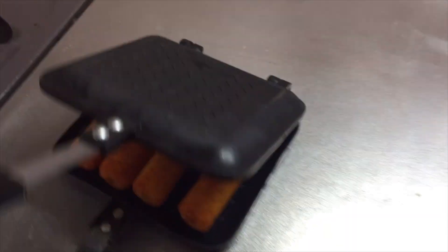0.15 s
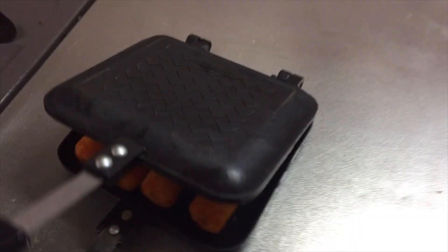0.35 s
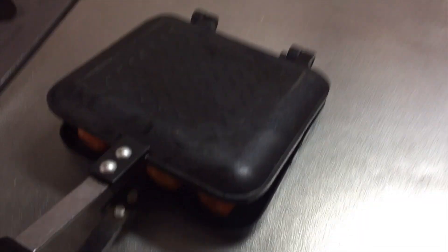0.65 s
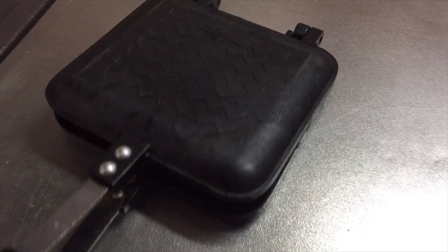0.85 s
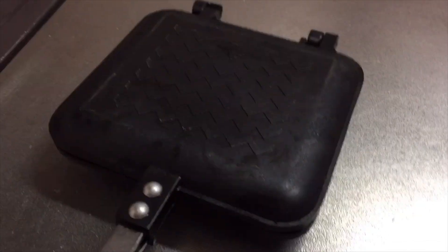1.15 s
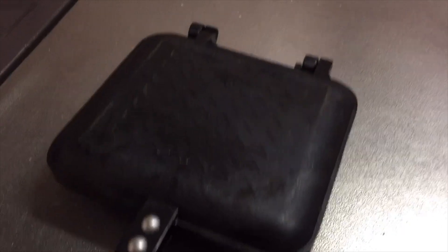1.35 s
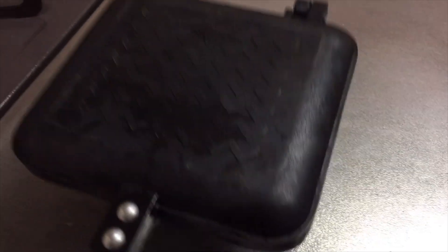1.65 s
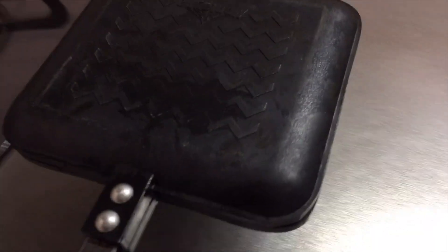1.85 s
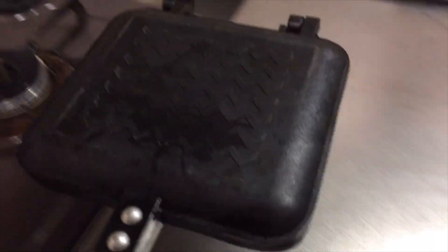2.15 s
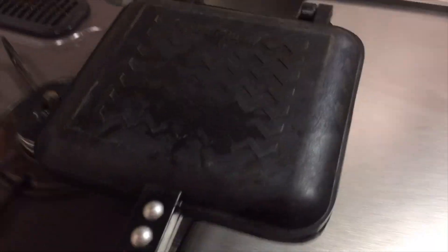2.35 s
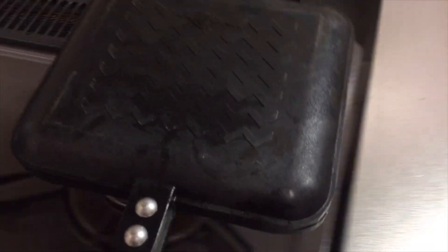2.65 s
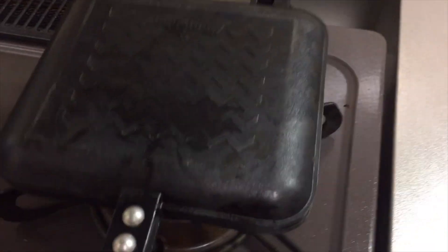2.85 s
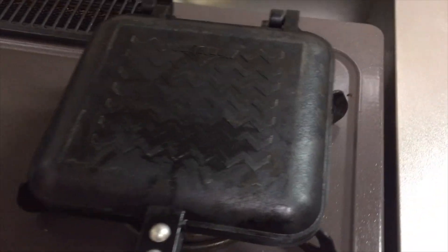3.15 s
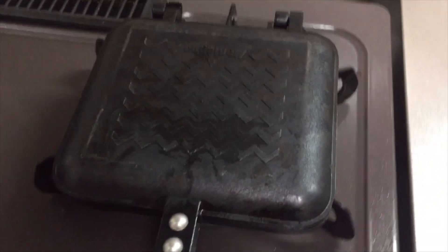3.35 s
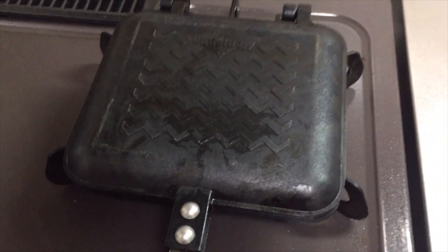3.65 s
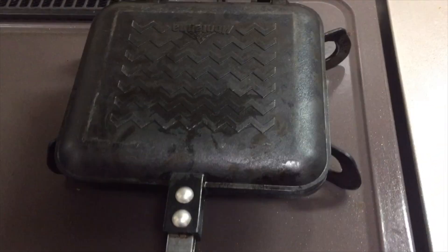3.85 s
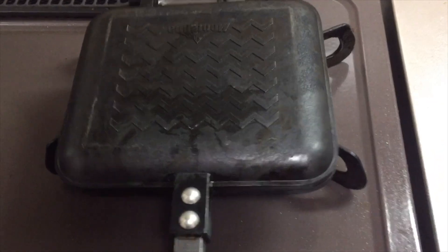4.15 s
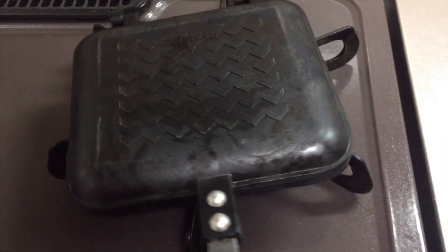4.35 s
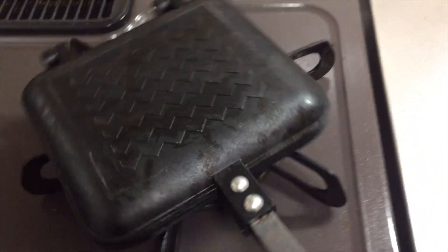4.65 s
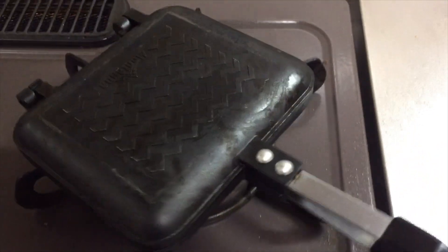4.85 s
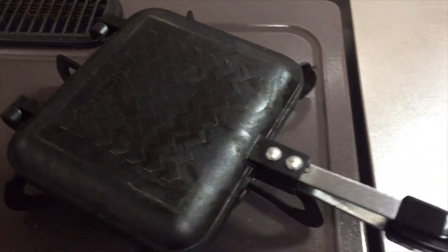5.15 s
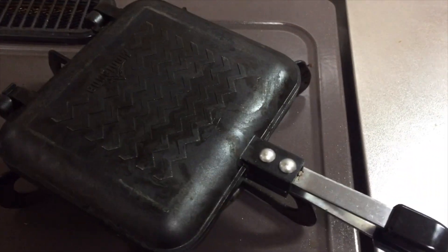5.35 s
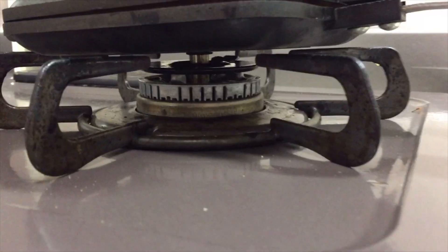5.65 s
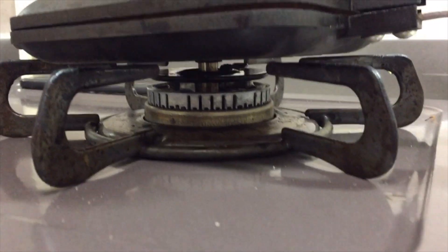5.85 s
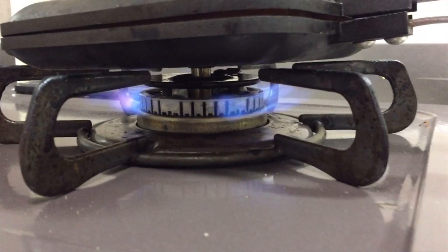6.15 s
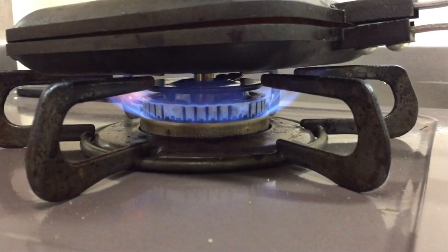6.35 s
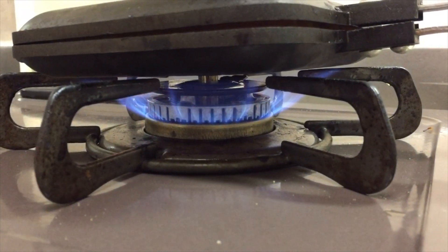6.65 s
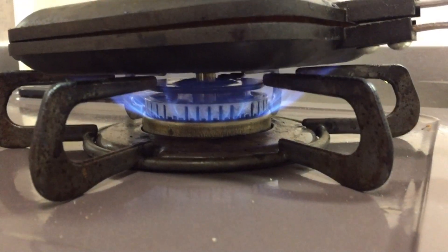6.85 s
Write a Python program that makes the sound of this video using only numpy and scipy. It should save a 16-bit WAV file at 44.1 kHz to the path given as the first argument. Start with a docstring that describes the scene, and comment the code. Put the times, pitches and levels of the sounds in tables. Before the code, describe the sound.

A small, quiet kitchen heard close up, with faint hush and a short diffuse echo. The first second is almost silent. Around 1.0 s a hinge squeaks faintly, then from 1.15 to 1.4 s the cast-metal press claps shut in a quick clatter, its hardest, dry ringing clack near 1.28 s. Small ticks and light scrapes follow until 2.8 s, clearest around 2.6 s. At 3.41 s the press hits the gas hob with a loud double clank, followed by a duller knock at 3.6 s. From 4.2 to 5.3 s it is turned on the trivet: clunks, grating, low hob rumble, thin scratches and tiny squeaks. At 5.55-5.8 s the knob clunks and rattles; gas begins hissing softly. From 5.9 s to the end, loud sharp sparks snap eight times a second; around 6.2-6.3 s gas catches with pops and a brief low flutter. Momentary sound dropouts occur near 1.1, 3.86 and 5.53 s.

```python
"""A small quiet kitchen, a phone close by: a cast-metal sandwich press is clapped shut on a steel worktop,
carried to a gas hob, set on the trivet and turned; blows and rough sliding ring its modes and its support. Then
the gas knob is pushed and turned, the igniter makes pressure snaps eight times a second under the press, and
hissing gas catches with a low flutter of shaped noise and a few pops, each a shaped click. A faint hush and the
room's noise-like echo surround it all; the sound drops out for a moment three times."""
import sys
import numpy as np
from scipy import signal
from scipy.fft import rfft, irfft
from scipy.io import wavfile
from scipy.ndimage import uniform_filter1d

SR = 44100
rng = np.random.default_rng(int(sys.argv[2]) if len(sys.argv) > 2 else 0)


def unload_audio(sound):
    """Save the sound as a 16-bit wav file, at the path given as the first command line argument."""
    columns = np.transpose(np.atleast_2d(sound))
    # keep every value between -1 and 1, then stretch to whole-number steps
    steps = np.round(np.clip(columns, -1, 1) * 32767)
    wavfile.write(sys.argv[1], SR, steps.astype(np.int16))


N = 308700

KNOB_S = 5.53  # from here on the hand works the gas knob

# ring of the cast-metal press: hz, level_db, t60_s
PRESS_MODES = [(688, 2, 0.1), (771, 2, 0.075), (900, -3, 0.1), (979, 4, 0.074), (1135, 2, 0.11),
               (1417, -6, 0.17), (1738, -2.5, 0.12), (1796, -6, 0.1), (2012, -0.5, 0.08), (2285, -1, 0.08),
               (2509, 1, 0.08), (2673, -2, 0.089), (2990, -3.5, 0.054), (3380, -5, 0.07), (3874, -7, 0.08),
               (4690, -10.5, 0.06)]
# ring of the gas knob and fascia: hz, level_db, t60_s
KNOB_MODES = [(684, 2, .07), (973, -3.5, .06), (1250, -1, .06), (1690, -4, .06), (2150, 2, .05),
              (2440, 2, .05), (2880, -4, 0.043), (3250, -6, .09), (3820, -5, .04), (4460, -2, .03)]
# moments when the sound drops out: from_s, to_s
DROPOUTS = [(1.097, 1.115), (3.852, 3.872), (5.526, 5.534)]


def undb(db):
    """Decibels to an amplitude ratio."""
    return 10 ** (np.asarray(db) / 20)


def unit(x):
    """Scale to unit energy."""
    return x / np.sqrt(np.sum(x ** 2))


def through(x, response):
    """Pass a signal through an impulse response."""
    return signal.fftconvolve(x, response)[:N]


def high_pass(x, order, hz):
    """Take away what lies below hz."""
    return signal.sosfilt(signal.butter(order, hz, "high", fs=SR, output="sos"), x)


def colour(spectrum, size=1024):
    """Causal response of unit energy with the given spectrum (folded cepstrum)."""
    hz, db = np.transpose(spectrum)
    bins_hz = np.arange(size // 2 + 1) * SR / size
    wanted_db = np.interp(np.log(bins_hz + 1), np.log(hz), db)
    cepstrum = irfft(np.log(undb(wanted_db)))
    cepstrum[1:size // 2] *= 2
    cepstrum[size // 2 + 1:] = 0
    return unit(irfft(np.exp(rfft(cepstrum))))


def tail(noise_db, t60):
    """A fading noise of the given energy."""
    t = np.arange(SR // 2) / SR
    fade = np.exp(-np.log(1000) * t / t60)
    return undb(noise_db) * unit(rng.standard_normal(len(t)) * fade)


def fading(power, t60):
    """Fresh noise whose power follows the input and dies away after it."""
    keep = 10 ** (-6 / (t60 * SR))
    smooth = signal.lfilter([1 - keep], [1, -keep], power)
    return np.sqrt(smooth + 1e-20) * rng.standard_normal(len(power))


def grains(scatter_db, size=N):
    """Noise whose samples have a long-tailed size: asperities that catch and let go."""
    grain_db = scatter_db * np.minimum(rng.exponential(size=size), 4)
    x = rng.standard_normal(size) * undb(grain_db)
    return x / x.std()


def bank(modes):
    """One fading sine per mode, a row each."""
    hz, db, t60 = np.transpose(modes)[:, :, None]
    t = np.arange(SR // 4) / SR
    return undb(db) * np.exp(-np.log(1000) * t / t60) * np.sin(2 * np.pi * hz * t)


def shifting(x, modes, scatter_db, drift, hop=2048):
    """The contact point wanders: each stretch of force meets the modes with new strengths and pitches."""
    seats = []  # six contact points, each with slightly moved pitches
    for d in rng.standard_normal((6, len(modes))):
        moved = np.c_[1 + drift * d, np.ones((len(d), 2))]
        seats.append(bank(np.array(modes) * moved))
    out, x = np.zeros(N + SR), np.append(x, np.zeros(2 * hop))
    chance = rng.standard_normal((N // hop + 1, len(modes)))
    choice = rng.integers(6, size=len(chance))
    for i, seat, gains in zip(range(0, N, hop), choice, chance):
        stretch = x[i:i + 2 * hop]
        if stretch.any():
            ring = unit(undb(scatter_db * gains) @ seats[seat])
            y = signal.fftconvolve(stretch * np.hanning(2 * hop), ring)
            out[i:i + len(y)] += y
    return out[:N]


def kitchen():
    """The hush of the room is coloured noise that swells slowly, with less treble until the first drop-out ends."""
    # the hush at first: hz, level_db per Hz (relative)
    early_hush = [(15, -22), (25, 1.5), (86, -7.5), (275, -14), (379, -18), (524, -17), (600, -20),
                  (974, -20), (7000, -35), (12000, -46), (16000, -58)]
    # the hush afterwards: hz, level_db per Hz (relative)
    later_hush = [(15, -54), (25, -2), (119, -6), (165, -14.5), (400, -15.5), (568, -20), (633, -15.5),
                  (1000, -23), (1110, -20), (1710, -21.5), (10000, -31), (15600, -34), (16100, -52)]
    early_db, later_db = -67.5, -67.5
    steps = np.repeat(rng.standard_normal(N // 4000 + 1), 4000)[:N]
    swell = uniform_filter1d(steps, size=4000)
    air = rng.standard_normal(N) * undb(0.53 * swell)
    early = undb(early_db) * through(air, colour(early_hush, size=4096))
    later = undb(later_db) * through(air, colour(later_hush, size=4096))
    return np.where(np.arange(N) < DROPOUTS[0][1] * SR, early, later)


def blows():
    """Each blow rings its own part of the press or knob, and forces the support and the rough faces."""
    # blows of metal on metal: start_s, ring_db, thud_db above ring, grit_db above ring,
    # centre_hz (loudest part of the ring), chatter_ms (time constant of the contact)
    hits = [(0.001, -61.5, 5, 2, 2750, 13), (1.074, -50.5, -15, 1.5, 2170, 2.7),
            (1.147, -41, -16, -14, 1100, 4.5), (1.165, -25.5, -40, 1, 1910, 4.6),
            (1.205, -33, -25, -10, 1500, 15), (1.238, -30, -24, -9, 1770, 3.8),
            (1.252, -31, -33, -18, 3400, 10.6), (1.276, -13.5, -42, -18, 940, 1.9),
            (1.335, -47, -20, -15, 1500, 4), (1.357, -38, -15, -4, 2000, 2.1),
            (1.382, -41, -17, -20, 2410, 2.5), (1.425, -46.5, 6, -16, 900, 6.8),
            (1.465, -52, -10, -9, 2000, 4), (1.499, -62, -5, -5, 2270, 3.3),
            (1.517, -58, -15, -10, 1500, 2.7), (1.617, -56, -21, -16, 1160, 3.6),
            (1.926, -61.5, -12, -4, 2230, 9.1), (1.991, -51.5, 6, -22, 437, 4.3),
            (2.012, -58, -2, -6, 480, 5), (2.094, -64.5, -15, 6, 1140, 2.8),
            (2.544, -44.5, -26, -7, 3520, 4.2), (2.602, -39.5, -21, -3, 2600, 3.4),
            (2.619, -44, -7, -1.5, 2520, 9.2), (2.759, -51, -9, -6, 1690, 15),
            (3.319, -71, -10, 3, 1670, 21), (3.4123, -14.5, -30, -4, 2200, 2.5),
            (3.4147, -13.5, -27, -5.5, 1150, 4.1), (3.601, -24.5, -2, -9.5, 1080, 36.5),
            (3.724, -35, 5, -45, 700, 8.1), (3.822, -57.5, 1, 3, 1420, 12), (3.876, -68, 3, -25, 960, 5),
            (3.935, -51, -8, -2.5, 1320, 15), (4.186, -43, -13.5, -11.5, 1795, 8.8),
            (4.293, -44.5, -9, -8, 1500, 28), (4.328, -19.5, -19.5, -22, 1450, 6.5),
            (4.379, -31.5, 1.5, -14.5, 700, 18.5), (4.454, -28.5, -6, -12.5, 900, 16),
            (4.539, -31, -23, -11, 1500, 3.5), (4.685, -35.5, -26, -13, 1410, 6.7),
            (4.752, -26.5, -2, -11.5, 830, 10.8), (4.77, -21, 3, -19, 705, 1.1),
            (4.853, -34.5, -22, -13, 1550, 16), (5.013, -49, -14, -11, 2290, 7.9),
            (5.07, -27, -2, -7.5, 900, 6.5), (5.08, -30.5, -12, -14, 2600, 4),
            (5.13, -22, -7.5, -18, 1100, 3.9), (5.159, -29.5, -6, -15, 790, 10),
            (5.28, -40, -31, -8, 1500, 17), (5.329, -49, 7.5, 2, 3060, 14),
            (5.447, -47.5, -29, -40, 1400, 15), (5.552, -30, -15, -14.5, 754, 9.1),
            (5.598, -36, 5, -23, 900, 10), (5.629, -48, 17.5, -25, 700, 8.6),
            (5.692, -42, -12, -5, 900, 7.1), (5.723, -35, -27, 6, 2450, 12.3),
            (5.741, -41, -15, -12, 1500, 4), (5.762, -41, -13, -6, 2500, 11),
            (6.102, -35.5, -7.5, -9, 1910, 16)]
    ring_fall_db, soft_fall = 3, 0.21  # fade per octave squared off centre; more dB for each dB less grit
    # first strike above the chatter at clean_ms; weaker for each doubling of chatter time
    strike_at_clean_db, strike_fall_db, clean_ms = -2.5, 5, 5.2
    hard_db, hard_gain = -25.5, 2.6  # blows above this level land cleaner, by this many dB per dB
    clank_bands_hz = (250, 400, 600, 850, 1200, 1700, 2400, 4800, 9600)
    clangs, force, t = np.zeros(N + SR), np.zeros((2, N)), np.arange(SR // 8) / SR
    for s, db, thud_db, grit_db, centre_hz, ms in hits:
        i, ms = int(s * SR), max(ms, .3)
        narrow_db = max(ring_fall_db - soft_fall * grit_db, 1)
        strike_db = strike_at_clean_db - strike_fall_db * np.log2(ms / clean_ms)
        strike_db += hard_gain * max(db - hard_db, 0)
        chatter = np.exp(-1000 * t / ms)
        force[:, i:i + len(t)] += np.outer(undb(db + np.array([thud_db, grit_db])), chatter)

        modes = np.array(KNOB_MODES if s > KNOB_S else PRESS_MODES)
        hz = modes[:, 0] * (1 + 0.012 * rng.standard_normal(len(modes)))  # the grip shifts the pitches a little
        mode_db = 2.5 * rng.standard_normal(len(hz)) - narrow_db * np.log2(hz / centre_hz) ** 2
        ring = unit(undb(mode_db) @ bank(np.c_[hz, modes[:, 1:]]))

        # many weak modes between the strong ones blur into a short clank
        floor_hz = min(500, .7 * centre_hz)
        spectrum = [(f, -narrow_db * np.log2(f / centre_hz) ** 2 - 40 * (f < floor_hz)) for f in clank_bands_hz]
        clank = through(tail(0.0, 0.045)[:SR // 4], colour(spectrum))[:SR // 4]

        size = np.sqrt(np.sum(chatter ** 2))
        push = chatter * grains(2.8, size=len(t)) + undb(strike_db) * size * (t == 0)
        y = through(push, ring + clank)
        clangs[i:i + len(y)] += undb(db) * size * unit(y)
    return clangs[:N], force


def shoves():
    """Each shove builds up, then dies away; gives the force on the press or knob, the support and the rough faces."""
    # sliding shoves: full_s (moment of full force), rise_s, t60_s, push_db, rumble_db above push, grit_db above push
    slides = [(1.085, 0.11, 0.5, -73, 7, 11), (1.168, 0.11, 0.83, -56, 10.5, 7),
              (1.449, 0.15, 0.3, -69.5, 7, -4), (2.384, 0.11, 0.5, -83, 17, 10),
              (2.61, 0.17, 0.31, -67, 9.5, 11.5), (2.768, 0.034, 0.75, -75.5, 4, 11),
              (2.93, 0.1, 0.1, -83, 3, 11), (3.608, 0.021, 0.62, -56, 17.5, -25),
              (3.792, 0.15, 0.5, -65.5, 16, -20), (3.939, 0.086, 0.35, -79, 18.5, 2),
              (4.188, 0.066, 1, -63.5, 13.5, -2), (4.401, 0.078, 1.5, -55.5, 20, -5.5),
              (4.47, 0.049, 0.19, -43.5, 1, 1), (4.641, 0.1, 0.7, -55.5, 15.5, -0.5),
              (4.689, 0.022, 0.13, -49, -7, 6.5), (4.759, 0.044, 0.92, -53, 19.5, -1.5),
              (4.9, 0.15, 0.07, -62.5, 22, 7), (5.092, 0.04, .5, -41.5, 11.5, -3),
              (5.29, 0.023, 0.18, -63.5, 10.5, -6), (5.5, 0.064, 1, -73, 20, -14),
              (5.559, 0.011, 0.38, -53, 14, -4.5), (5.65, 0.074, .5, -67.5, 27, -27),
              (5.728, 0.017, 0.43, -49.5, 7, 4.5)]
    t, force = np.arange(N) / SR, np.zeros((3, N))
    for s, rise, t60, db, rumble_db, grit_db in slides:
        build = np.clip(1 + (t - s) / rise, 0, 1) ** 2
        shape = build * undb(-60 * np.maximum(t - s, 0) / t60)
        force += np.outer(undb(db + np.array([0, rumble_db, grit_db])), shape)
    return force


def metal():
    """Rough contact rings the press, the knob and what stands below; the finest grains sound as grit."""
    # ring of the steel worktop: hz, level_db, t60_s
    worktop_modes = [(70, -1, 0.069), (101.5, -5, 0.24), (142.5, -4, 0.054), (245, -1.5, 0.049),
                     (304, -9.5, 0.079)]
    # ring of the gas hob: hz, level_db, t60_s
    hob_modes = [(100, -8.5, 0.25), (123, -7.5, 0.18), (177, -1, 0.18), (218.5, 2, 0.074), (279.5, 2, 0.13),
                 (346, -0.5, 0.11), (384.4, 1, 0.086), (430, 1, 0.05), (523, -5.5, 0.078)]
    # small parts (hinge, rivets, trivet tips): hz, level_db, t60_s
    fitting_modes = [(3704, -2, 0.033), (4050, 0.5, 0.033), (4410, 0.5, 0.03), (5130, -2, 0.021),
                     (5663, -1, 0.039), (6476, -1.5, 0.036), (6970, -6, .03), (7400, -5.5, 0.021),
                     (8430, -4.5, .03), (9300, -4.5, .03)]
    # grit of steel on steel: hz, level_db per Hz (relative)
    steel_grit = [(1760, -37), (3000, -1), (4980, -5), (6440, -6.5), (6960, -11.5), (14800, -14.5),
                  (16000, -43), (16500, -39)]
    # grit on the enamelled trivet: hz, level_db per Hz (relative)
    enamel_grit = [(1760, -24), (3000, 2.5), (4540, -7.5), (4980, -13.5), (5780, -12), (9600, -16.5),
                   (11000, -23), (13500, -26), (15800, -36), (16500, -41.5)]
    on_hob_s = 3.2
    rattles_per_s, rattle_db = 110, 18  # loose parts knock in the slide; size above the sliding force
    t = np.arange(N) / SR
    on_hob, at_knob = t > on_hob_s, t >= KNOB_S
    on_trivet = on_hob & (t < KNOB_S)

    clangs, (thud, grit) = blows()
    push, rumble, scrape = shoves()
    k = SR // 90  # sliding faces catch and slip some ninety times a second
    catches = np.repeat(rng.standard_normal(N // k + 1), k)[:N]
    slips = undb(3.0 * uniform_filter1d(catches, size=60))
    rough = grains(4.8)
    rub = push * slips * rough
    thud = (thud + rumble * np.sqrt(slips)) * grains(1.7)  # the heavy support smooths the slips
    grit = (grit + scrape * slips) * rough

    press_ring = shifting(rub * ~at_knob, PRESS_MODES, 7.0, .015, hop=1024)
    knob_ring = shifting(rub * at_knob, KNOB_MODES, 5.0, .02, hop=1024)
    grind_colour = colour([(300, -13.5), (700, 14), (2500, 7.5), (4500, -8), (8000, -34)])
    grind = undb(5.0) * (press_ring + knob_ring) + undb(5.5) * through(rub, grind_colour)

    support = shifting(thud * on_hob, hob_modes, 3.5, 0.039)
    support = support + shifting(thud * ~on_hob, worktop_modes, 3.7, 0.031)
    support = high_pass(support, 2, 75)

    # small parts ring briefly in the grit and in the knocks
    tinkle = undb(-5.5) * shifting(grit, fitting_modes, 6.5, .02, hop=1024)
    knocks = (rng.random(N) < rattles_per_s / SR) * rng.standard_normal(N) * undb(rattle_db) * ~at_knob
    tinkle = tinkle + shifting(knocks * scrape, fitting_modes, 8.0, .03, hop=512)
    tinkle = tinkle + shifting(knocks * push, PRESS_MODES[4:], 8.0, 0.023, hop=512)

    scratch = through(grit * ~on_trivet, colour(steel_grit)) + through(grit * on_trivet, colour(enamel_grit))
    press = high_pass(clangs + grind + scratch + tinkle, 6, 560)  # the ring, grind, grit and tinkle of the press keep nothing below 560 Hz
    return press + support


def curve(table):
    """Columns along time, and an edge that is silent outside the table."""
    s, *columns = np.transpose(table)
    t = np.arange(N) / SR
    edge = np.clip(np.minimum(t - s[0], s[-1] - t) / .01, 0, 1)
    return edge, [np.interp(t, s, c) for c in columns]


def hinge():
    """Stick-slip in the hinge pin excites two gliding, wavering partials."""
    # squeak as the lid swings: time_s, pitch_hz, level_db (before the waver)
    squeak_path = [(.95, 2690, -73), (1.02, 2780, -76), (1.06, 2950, -63), (1.097, 2900, -72)]
    edge, (hz, db) = curve(squeak_path)
    phase = 2 * np.pi * np.cumsum(hz) / SR
    waver = 12 * uniform_filter1d(rng.standard_normal((2, N)), size=120, axis=1)
    partials = waver[0] * np.sin(phase) + waver[1] * np.sin(1.44 * phase)
    return edge * undb(db) * partials


def squeaks():
    """A face sticks and sings: each squeak is a wavering tone under a smooth swell."""
    # brief squeaks: start_s, length_s, pitch_hz, level_db (pitch and level before the waver)
    cries = [(1.197, .05, 3250, -50), (1.33, .03, 3200, -58), (4.638, 0.048, 1260, -42),
             (4.7, 0.022, 2550, -44), (4.85, .03, 4300, -49), (5.157, 0.028, 2650, -44),
             (5.21, 0.023, 2640, -49), (5.245, .02, 2620, -52), (5.285, 0.025, 1130, -41),
             (5.285, 0.023, 2140, -47), (5.825, .06, 3250, -56)]
    out = np.zeros(N)
    for s, length, hz, db in cries:
        t = np.arange(int(length * SR)) / SR
        waver = uniform_filter1d(rng.standard_normal((2, SR // 10)), size=200, axis=1)[:, :len(t)]
        phase = 2 * np.pi * np.cumsum(hz * (1 + 0.15 * waver[0])) / SR
        loudness = undb(db + 38 * waver[1]) * np.hanning(len(t))
        out[int(s * SR):][:len(t)] += loudness * np.sin(phase)
    return out


def ticks():
    """A short scratch rings the tips of the trivet, thin and high."""
    # scratches on the tips: start_s, force_db
    scratches = [(4.381, -42), (4.454, -46), (4.539, -34.5), (4.684, -44), (4.764, -50), (4.855, -52),
                 (5.092, -50), (5.445, -63)]
    # ring of the trivet tips: hz, level_db, t60_s
    tip_modes = [(8770, 0, 0.037), (9550, 0, .025), (11700, -3, .03), (12300, -2, 0.017), (13200, -4, .02),
                 (14600, -7, .015)]
    fade_ms = 3.8
    force, t = np.zeros(N), np.arange(SR // 10) / SR
    for s, db in scratches:
        force[int(s * SR):][:len(t)] += undb(db) * np.exp(-1000 * t / fade_ms)
    force = force * grains(2.4)
    hash_colour = colour([(4000, -27), (7500, -2), (12000, 3.0), (15800, -10), (16500, -32)])
    return shifting(force, tip_modes, 3.5, .02) + undb(-1.0) * through(force, hash_colour)


def burner():
    """Gas hisses from the ports; as it lights the flame front flutters low and pops."""
    # hiss of the gas: hz, level_db per Hz (relative)
    gas_hiss = [(120, -38), (200, -14), (860, -12), (1520, -1.5), (1900, 8), (2210, 3.5), (5870, -3.5),
                (15000, -14), (16500, -45)]
    # gas pockets lighting: start_s, level_db (before a common lift)
    pockets = [(6.213, -30), (6.229, -28.5), (6.258, -31), (6.279, -23.5)]
    gas_db, gas_on_s, gas_rise_s, pop_lift_db = -56.5, 5.8, 0.088, 11.5
    # the flutter grows by swell_db up to its peak, then dies away
    flame_db, flame_on_s, flame_peak_s, swell_db, flame_t60_s = -31, 6.15, 6.285, 6, 0.065
    t = np.arange(N) / SR
    opening = np.clip((t - gas_on_s) / gas_rise_s, 0, 1)
    hiss = undb(gas_db) * opening * through(rng.standard_normal(N), colour(gas_hiss))

    edge = np.clip((t - flame_on_s) / 0.016, 0, 1)
    growth_db = -swell_db * np.maximum(flame_peak_s - t, 0) / (flame_peak_s - flame_on_s)
    decay_db = -60 * np.maximum(t - flame_peak_s, 0) / flame_t60_s
    flame_colour = colour([(30, -43), (70, 4.5), (130, -3.5), (280, -4), (500, -20.5), (1200, -42)], size=4096)
    flutter = edge * undb(flame_db + growth_db + decay_db) * through(grains(1.8), flame_colour)

    pops = np.zeros(N)
    for s, db in pockets:
        pops[int(s * SR)] = undb(db + pop_lift_db)
    pop_colour = colour([(100, -57), (500, 5), (2000, 3), (6000, -19), (16000, -40)])
    return hiss + flutter + through(pops, pop_colour)


def igniter():
    """Each spark is a short pressure jump with echoes, a dull thump and a hash of echoes under the press."""
    # strength of each snap in turn: level_db
    strengths_db = [-4.5, -6.5, -4, -9, -9, -9, -8, -6.5, -8.5]
    # burner cap, press underside and hob top return the snap: delay_ms, level_db, brightness (0-1)
    reflections = [(0, -3, .2), (.7, 3, .75), (.85, -3, .9), (1.5, -3, .4), (1.7, -2, .5), (2.45, -6, .35),
                   (2.7, -8, .4), (5.1, -10, .95)]
    # hash in the gap under the press: hz, level_db per Hz (relative)
    gap_ring = [(180, -28), (300, -16), (343, -14), (780, -18), (892, -4.5), (1040, -12), (1270, -3),
                (1690, 5), (2320, 5), (3840, 6.5), (6300, 8.5), (12500, 7), (15600, 3), (16200, -19)]
    first_s, period_s, lit_s = 5.8913, .12578, 6.2
    unlit_thump_db, lit_thump_db = -19.5, -30.5  # thump drive above snap, before and after the gas is lit
    snaps, thumps = np.zeros(N), np.zeros(N)
    for s, db in zip(np.arange(first_s, N / SR, period_s), strengths_db):
        thump_db = lit_thump_db if s > lit_s else unlit_thump_db
        snaps[int(s * SR)] = undb(db)
        thumps[int(s * SR)] = undb(db + thump_db)

    t, echoes = np.arange(SR // 100) / SR, 0
    for ms, db, bright in reflections:
        u = (t - (ms + .1) / 1000) * (15000 + 45000 * bright)  # a brighter echo is a narrower pulse
        echoes = echoes + undb(db) * (u ** 2 - 1 + 0.64 * u) * np.exp(-u ** 2 / 2)

    late = np.roll(snaps, int(0.00026 * SR)) ** 2
    lingering = undb(5) * fading(late, .02) + undb(3.5) * fading(late, 0.091)
    gap = through(lingering, colour(gap_ring))

    n = np.arange(800)
    thump = np.sin(2 * np.pi * 160 * n / SR) * np.exp(-n / (0.00064 * SR))
    return through(snaps, echoes) + gap + 4.14 * through(thumps, thump)


def room(x):
    """Diffuse kitchen echo: each half-octave band lingers as noise at its own pace."""
    # how long the kitchen lingers: hz, t60_s
    reverberation = [(200, 0.3), (800, 0.27), (2500, 0.28), (6000, 0.29), (12000, 0.21)]
    echo_db = -9.5
    hz, t60 = np.transpose(reverberation)
    out = 0
    for f in 125 * 2 ** np.arange(0, 7.1, .5):
        edges_hz = [f / 2 ** .25, min(f * 2 ** .25, 16000)]
        band = signal.butter(2, edges_hz, "band", fs=SR, output="sos")
        echo = fading(signal.sosfilt(band, x) ** 2, np.interp(np.log(f), np.log(hz), t60))
        out = out + signal.sosfilt(band, echo) * np.sqrt(SR / f)
    return undb(echo_db) * np.append(np.zeros(150), out)[:N]  # the echo starts 150 samples late


def scene():
    """All the near sources, their echo in the room and the hush of the kitchen."""
    near = metal() + ticks() + hinge() + squeaks() + igniter() + burner()
    return (near + room(near) + kitchen())[None]


def record(dry):
    """The microphone loses deep bass and dips in the high treble; the sound drops out three times; the top ends steeply."""
    bass_hz, top_hz = 55, 16800
    dip_hz, dip_width_hz, dip_share = 10400, 900, 0.4
    t, gate = np.arange(N) / SR, 1
    for off, on in DROPOUTS:
        # down within 3 ms, back within 10 ms, 40 dB lower in between
        gate = gate * np.clip(np.maximum((off - t) / .003, (t - on) / .01), .01, 1)
    mic = high_pass(dry, 3, bass_hz)
    mic = mic - dip_share * signal.lfilter(*signal.iirpeak(dip_hz, dip_hz / dip_width_hz, fs=SR), mic)
    return signal.sosfilt(signal.ellip(10, .5, 80, top_hz, fs=SR, output="sos"), mic * gate)


dry = scene()
out = record(dry)
unload_audio(out)
```